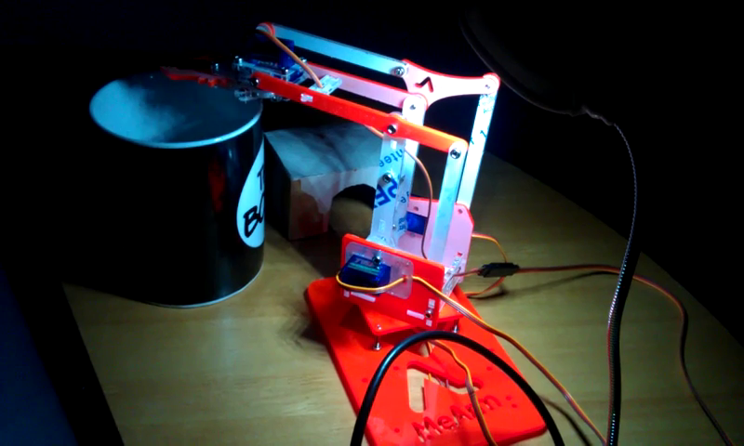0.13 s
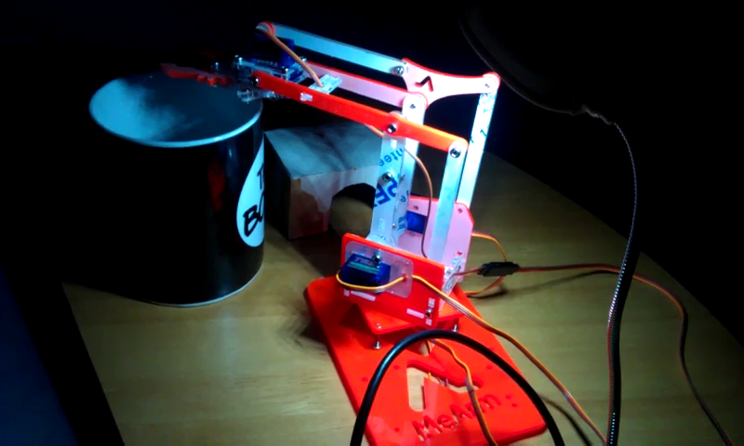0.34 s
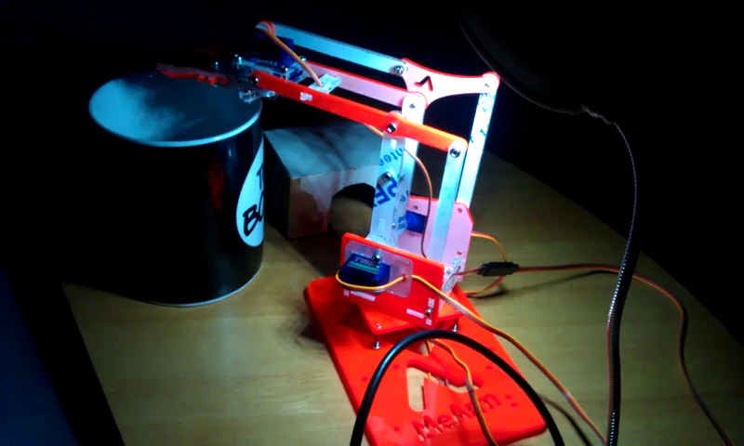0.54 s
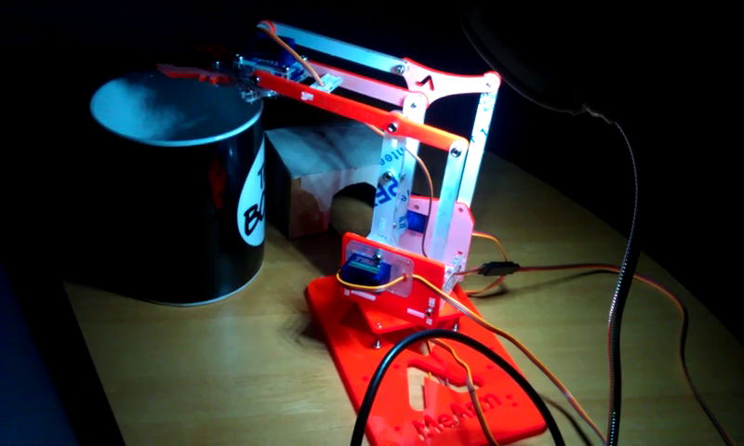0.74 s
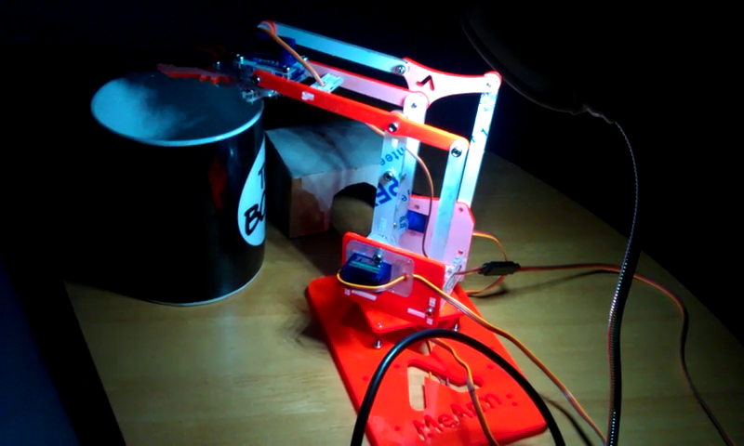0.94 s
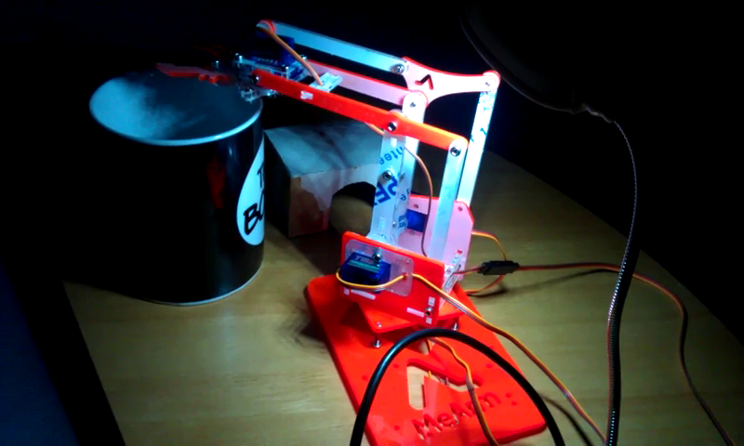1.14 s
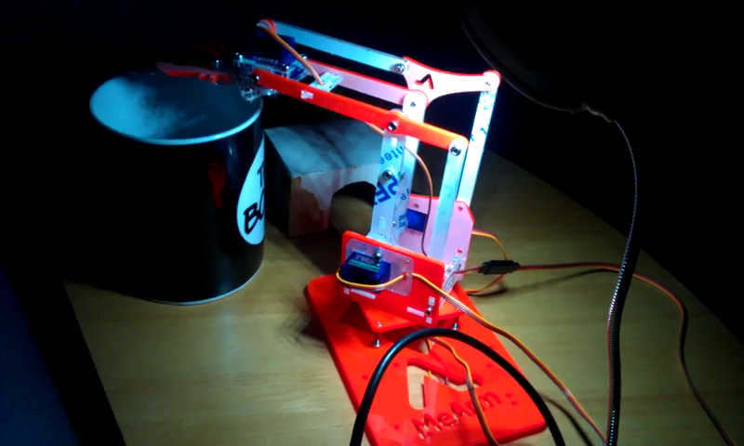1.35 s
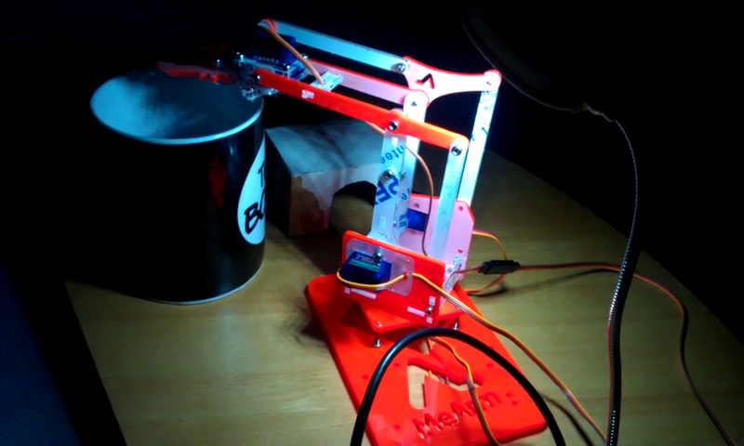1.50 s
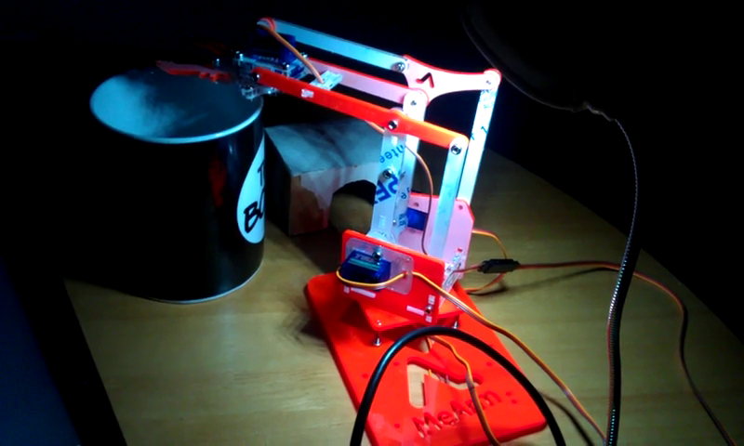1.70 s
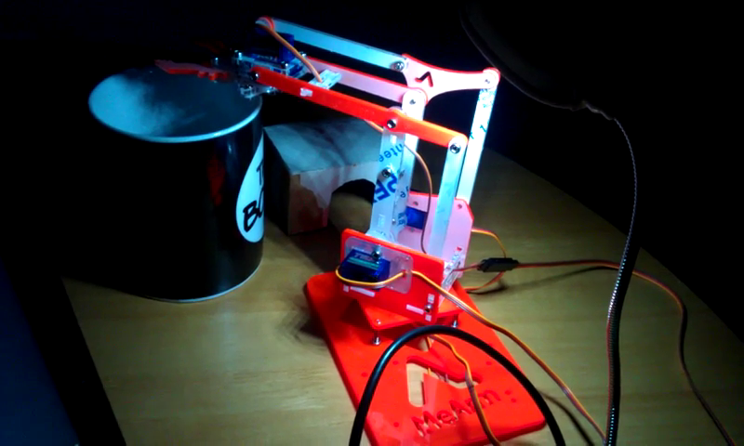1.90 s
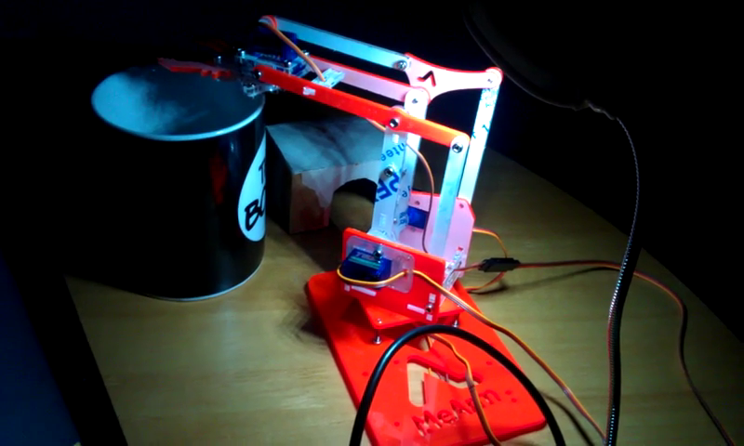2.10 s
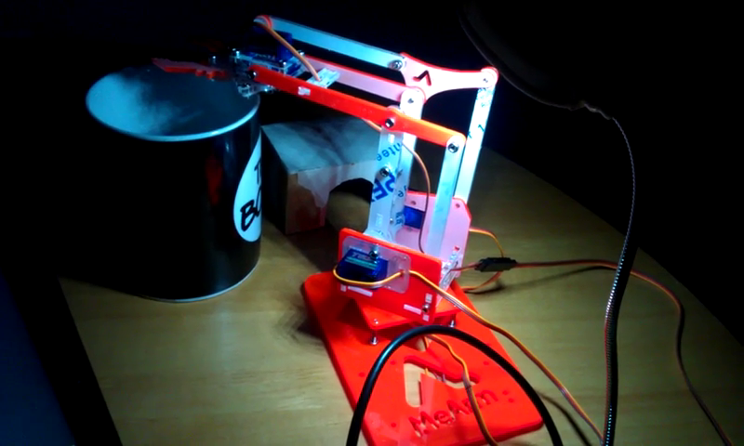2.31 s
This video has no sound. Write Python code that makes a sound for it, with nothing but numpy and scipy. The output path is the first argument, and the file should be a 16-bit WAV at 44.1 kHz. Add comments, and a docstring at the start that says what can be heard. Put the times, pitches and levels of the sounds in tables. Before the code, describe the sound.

One loud, ringing clatter sounds as something hard falls into a ceramic mug, briefly overloading the microphone. Before and after it, the servos of a small robot arm tick softly and fast, twitching occasionally in a quiet, hissing room.

```python
"""In a quiet, hissing room, the motors (servos) of a small robot arm tick fifty times a second.
The arm lets a hard object fall into a ceramic mug on a wooden desk. From about 0.19 s it rattles down
the wall, ringing the mug loudly enough to overload the microphone. At about 0.24 s it lands on the
bottom, which damps the high ring. The servos tick harder just after letting go, then relax and
tick on to the end, with a twitch now and then."""
import sys
import numpy as np
from scipy import signal
from scipy.fft import rfft, irfft
from scipy.io import wavfile

SR = 44100
rng = np.random.default_rng(int(sys.argv[2]) if len(sys.argv) > 2 else 0)


def file_out(sig):
    """Save sig as 16-bit WAV at sys.argv[1]."""
    # one column per channel
    cols = np.atleast_2d(sig).T
    # limit, then scale
    lim = np.clip(cols, -1, 1)
    pcm = np.round(lim * 32767).astype(np.int16)
    wavfile.write(sys.argv[1], SR, pcm)


N = 103635
TIME = np.arange(N) / SR
SERVO_PERIOD_S = .02
BACKGROUND_RIGHT_DB = -7  # gear whirr and hiss are weaker on the right

# Levels in the tables are relative. A fade time (t60) is how long a sound takes to drop by 60 dB.
# Each hit on the mug: (time [s], high ring level [dB], low ring level [dB], knock level [dB])
HITS = [(.189, -16.5, -36.5, -3.5), (0.1967, -9, -30.5, -2), (.1975, -9, -33.5, -4.5),
        (0.2019, 2.5, -35, -3), (.214, 3, -36.5, -4), (.231, 2.5, -22.5, -7), (.238, -4, -22.5, -8.5),
        (.254, -19, -27, -5), (0.261, -26.5, -38, -4), (.277, -23.5, -38, -18)]
# The mug's ringing tones, plus a faint, brief, very high whistle of overload (the last row):
# (pitch [Hz], level [dB], fade time [s], right minus left [dB])
RING_TONES = [(2553, -1, 0.42, -6.5), (2646.4, -8, 0.48, -7.5), (3960, -21, 0.73, -7.5),
              (5090, -13, .31, -7), (6065, -27, 0.25, -7), (6351, 0, .23, -1), (6787, -27, .31, -5.5),
              (8221, -29.5, .23, -3.5), (8623, -26.5, 0.2, -0.5), (11135, -27.5, .15, -4),
              (13641, -33, .07, -13)]
def mug_ring():
    """The mug's wall vibrates: mostly high tones as the object rattles down, low ones as it lands."""
    times, high_db, low_db, _ = np.transpose(HITS)
    landing_s, landing_length_s, landing_loss_db = .238, .012, 13.5
    damping_db = landing_loss_db * np.clip((TIME - landing_s) / landing_length_s, 0, 1)
    right_lead_s = .000017  # the sound reaches the two microphone openings at different times
    out = np.zeros((2, N))
    for hz, db, t60, right_db in RING_TONES:
        if hz < 4500:  # low tones are not damped by the landing
            left = hit_envelope(times, low_db + db, fade_db(t60))
        else:
            left = hit_envelope(times, high_db + db, fade_db(t60) + damping_db)
        right = lag(left, seconds=.0077) * from_db(right_db)  # the far side builds up more slowly
        phase = 2 * np.pi * (hz * TIME + rng.random())
        out += [left * np.sin(phase), right * np.sin(phase + 2 * np.pi * hz * right_lead_s)]
    return room(out, echo_db=-30)


# The tone colour of a clack: (frequency [Hz], level [dB])
CLACK_SPECTRUM = [(40, -30), (150, -13.5), (300, -6), (1200, -5.5), (3000, -10), (4800, -4), (6300, 10),
                  (7400, -1), (9000, -16), (13000, -28), (17000, -46)]
def clacks():
    """Hard object meets hard mug: each hit gives a short, bright burst of noise."""
    times, _, _, knock_db = np.transpose(HITS)
    bursts = noise(CLACK_SPECTRUM) * hit_envelope(times, knock_db - 12, fade_db(t60=.033))
    return room(stereo(bursts, right_db=-12), echo_db=-6)


# The dull tones of mug and desk shaking together: (pitch [Hz], level [dB], fade time [s])
DESK_TONES = [(226, -38, 0.18), (317, -27, 0.1), (449, -36.5, .08), (615, -31.5, 0.11), (684, -29.5, .1),
              (791, -31.5, 0.08), (1575, -44, .05)]
def desk_thuds():
    """Each hit also shakes the wooden desk under the mug."""
    times, _, _, knock_db = np.transpose(HITS)
    thuds = np.zeros(N)
    for hz, db, t60 in DESK_TONES:
        tone = np.sin(2 * np.pi * (hz * TIME + rng.random()))
        thuds += tone * hit_envelope(times, knock_db + db, fade_db(t60))
    bass_cut = signal.butter(2, 150, "high", fs=SR, output="sos")
    return room(stereo(signal.sosfilt(bass_cut, thuds), right_db=-12), echo_db=-18.5)


# The ticks of one control pulse: (time after the main tick [s], level [dB], right minus left [dB])
PULSE_TICKS = [(-.002, -6, -12), (0, 0, -12), (.0104, -17, 0)]
# Single harder kicks of a servo: (time [s], level [dB])
TWITCHES = [(0.0543, -33), (0.1341, -34.5), (0.594, -37), (0.6345, -37), (0.9941, -34.5), (1.1139, -35.5),
            (1.1543, -39), (1.1942, -35), (1.2341, -39.5), (1.274, -34), (1.3538, -36.5), (1.3942, -38),
            (1.4341, -37.5), (1.734, -34), (1.8138, -39.5), (2.0941, -35.5), (2.134, -37), (2.174, -35),
            (2.2538, -39.5)]
def servos():
    """Each control pulse kicks the gears. The servos strain after letting go, then relax."""
    peak_s, peak_db, rise_db_per_s, fall_db_per_s = .28, 20, 114, 80.5
    below_peak_db = np.maximum(rise_db_per_s * (peak_s - TIME), fall_db_per_s * (TIME - peak_s))
    effort = 1 + from_db(peak_db - below_peak_db)
    pulse_times = np.arange(.0143, N / SR, SERVO_PERIOD_S)
    kicks = from_db(-47) * np.interp(pulse_times, TIME, effort)
    for time, db in TWITCHES:
        nearest = np.argmin(abs(pulse_times - time))
        kicks[nearest] = from_db(db - 5)
    out = stereo(gear_whirr(effort), BACKGROUND_RIGHT_DB)
    for delay, db, right_db in PULSE_TICKS:
        gains = kicks * from_db(db + rng.standard_normal(len(kicks)))  # ticks vary by about 1 dB
        out += stereo(gear_ticks(pulse_times + delay, gains), right_db)
    treble_only = signal.butter(8, (2400, 7200), "band", fs=SR, output="sos")
    return room(signal.sosfilt(treble_only, out), echo_db=-14.5)


# The tones the gearbox rings with: (pitch [Hz], level [dB])
GEAR_TONES = [(2950, -1.5), (3420, 1.5), (4040, 0.5), (4480, -1), (4800, 3), (5550, -4), (6020, -2),
              (6660, 1), (7050, -0.5)]
def gear_ticks(times, gains, kinds=4, rise_s=.0009):
    """Each kick rings the gearbox briefly. The teeth meet in a few ways, each with its own tick."""
    t = TIME[TIME < SERVO_PERIOD_S]
    shape = fade(t60=.012)[:len(t)] * np.minimum(t / rise_s, 1)
    kind_of_tick = rng.integers(0, kinds, len(times))
    out = np.zeros(N)
    for kind in range(kinds):
        ring = sum(from_db(db) * np.sin(2 * np.pi * (hz * t + rng.random())) for hz, db in GEAR_TONES)
        tick = ring / ring.std() * shape / shape.max()
        out += play_through(clicks(times, gains * (kind_of_tick == kind)), tick)
    return out


def gear_whirr(effort):
    """The gears whirr faintly between ticks, a little louder when the servos work harder."""
    return noise(GEAR_TONES) * effort ** .24 * from_db(-65)


# The tone colour of the hiss: (frequency [Hz], level [dB])
HISS_SPECTRUM = [(30, 1), (70, -24), (150, -6), (260, 0.5), (450, -4.5), (1300, -1.5), (2400, -0.5),
                 (7200, -1.5), (7900, -8.5), (12000, -21), (15000, -53)]
def hiss():
    """Room and microphone hiss steadily, with separate noise on each side."""
    left, right = noise(HISS_SPECTRUM), noise(HISS_SPECTRUM)
    return from_db(-61) * np.array([left, right * from_db(BACKGROUND_RIGHT_DB)])


def room(x, echo_db):
    """Add the room's echo: a smooth, fading tail, different on each side."""
    tails = rng.standard_normal((2, N)) * fade(t60=.62) * np.minimum(TIME / .01, 1)
    echo = [play_through(side, tail / np.linalg.norm(tail)) for side, tail in zip(x, tails)]
    return x + from_db(echo_db) * np.array(echo)


def hit_envelope(times, levels_db, loss_db, contact_s=.0005):
    """How strong a vibration is over time: each hit adds energy, and the growing loss drains it."""
    db_to_log = np.log(10) / 10
    added_db = levels_db + np.interp(times, TIME, loss_db)  # a hit is spared the loss before it
    total_db = np.logaddexp.accumulate(added_db * db_to_log) / db_to_log  # running sum of energy
    last_hit = np.searchsorted(times, TIME) - 1
    struck = last_hit >= 0
    envelope = np.zeros(N)
    envelope[struck] = from_db(total_db[last_hit[struck]] - loss_db[struck])
    return lag(envelope + 1e-18, contact_s)


def fade_db(t60):
    """How many decibels a freely ringing tone has lost at each moment."""
    return 60 * TIME / t60


def fade(t60):
    """A volume curve that drops by 60 dB in t60 seconds."""
    return from_db(-fade_db(t60))


def lag(x, seconds):
    """Smooth a volume curve so that it follows a little late."""
    keep = np.exp(-1 / (seconds * SR))
    return signal.lfilter([1 - keep], [1, -keep], x)


def noise(spectrum):
    """Noise with the given tone colour and a typical size (rms) of 1."""
    hz, db = np.transpose(spectrum)
    frequencies = np.maximum(np.fft.rfftfreq(N, 1 / SR), 1)
    gains = from_db(np.interp(np.log(frequencies), np.log(hz), db))
    x = irfft(rfft(rng.standard_normal(N)) * gains, N)
    return x / x.std()


def clicks(times, gains):
    """One-sample clicks at the given times."""
    out = np.zeros(N + SR)
    np.add.at(out, (np.maximum(times, 0) * SR).astype(int), gains)
    return out[:N]


def play_through(x, response):
    """Let every sample of x set off its own copy of the response."""
    return signal.fftconvolve(x, response)[:N]


def stereo(x, right_db):
    """Turn one channel into two, with the right one changed by right_db."""
    return np.array([x, x * from_db(right_db)])


def from_db(db):
    """Turn decibels into a number to multiply by."""
    return 10 ** (np.asarray(db) / 20)


def scene():
    """Mug, desk, servos and room together."""
    return mug_ring() + clacks() + desk_thuds() + servos() + hiss()


def record(dry):
    """The microphone overloads, flattening the loudest peaks; the very highest treble is cut."""
    clipped = np.clip(dry, -.87, .87)
    treble_cut = signal.cheby2(12, 45, 16500, fs=SR, output="sos")
    return signal.sosfilt(treble_cut, clipped)


dry = scene()
out = record(dry)
file_out(out)
```